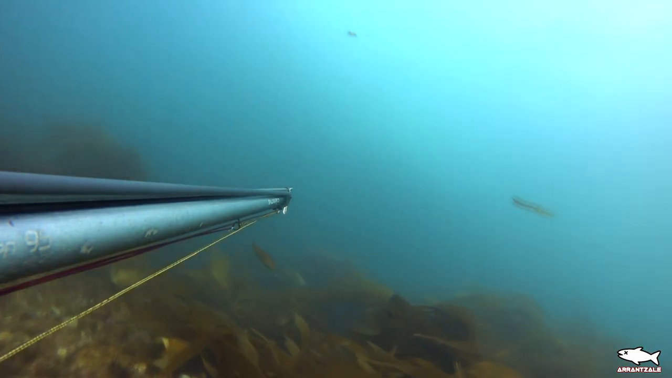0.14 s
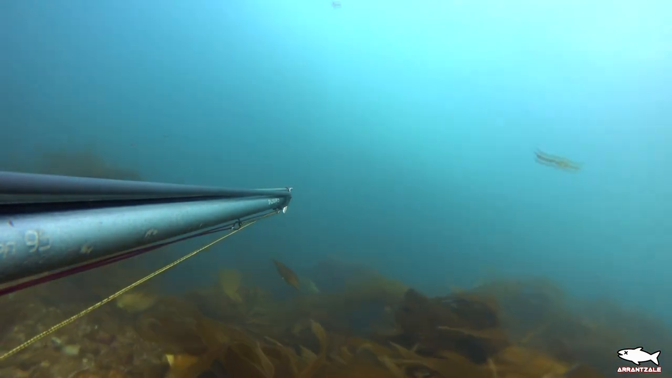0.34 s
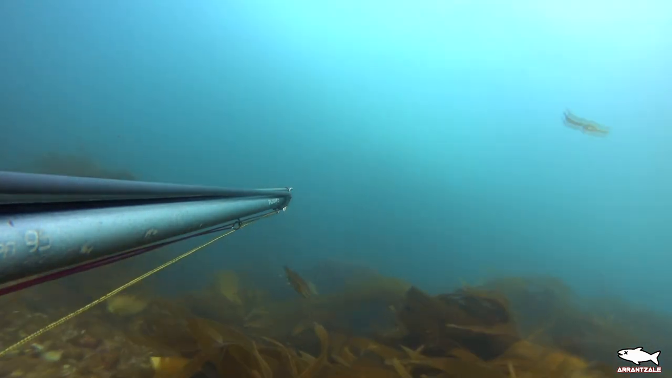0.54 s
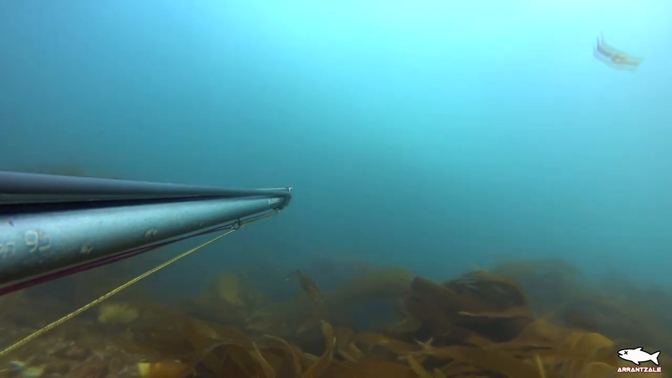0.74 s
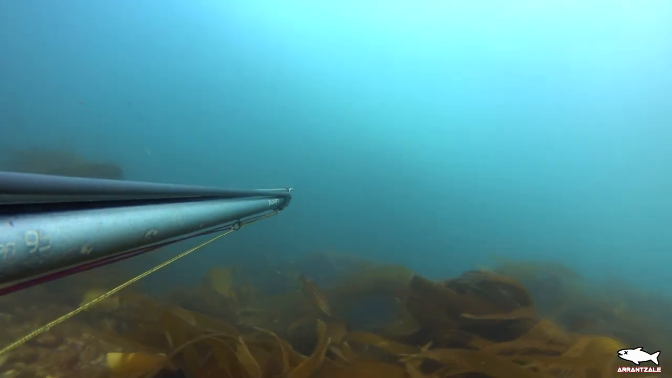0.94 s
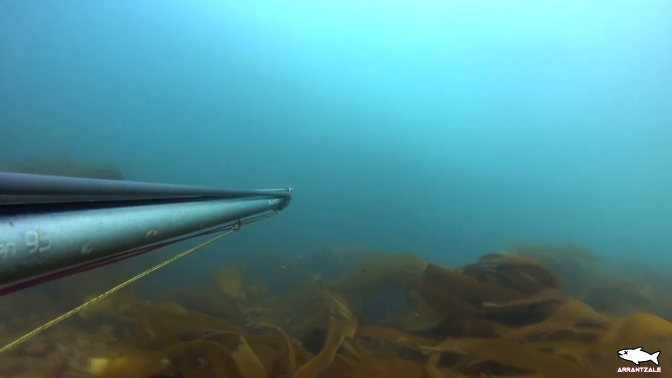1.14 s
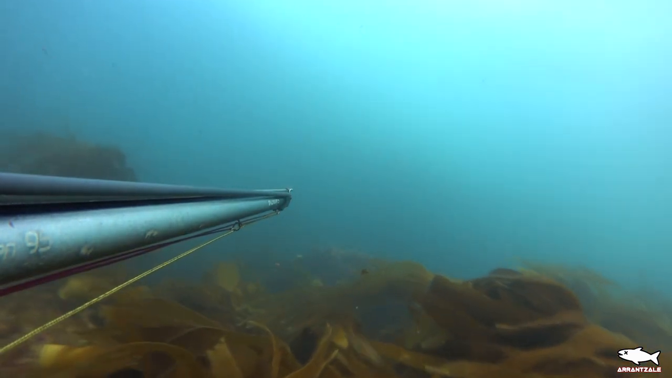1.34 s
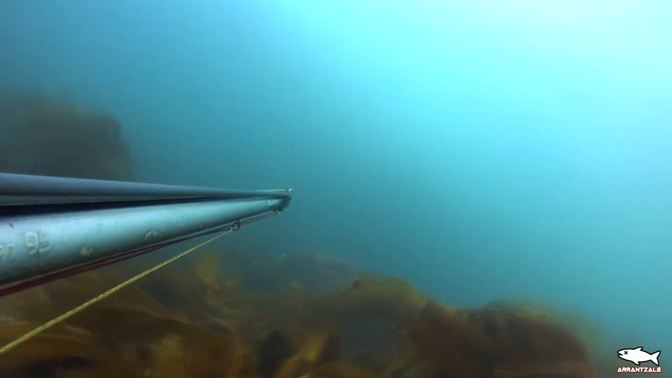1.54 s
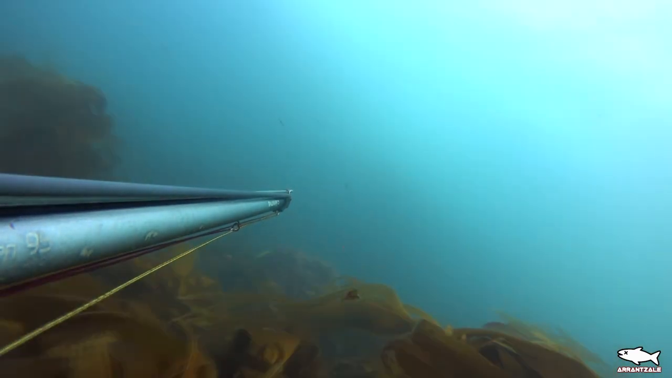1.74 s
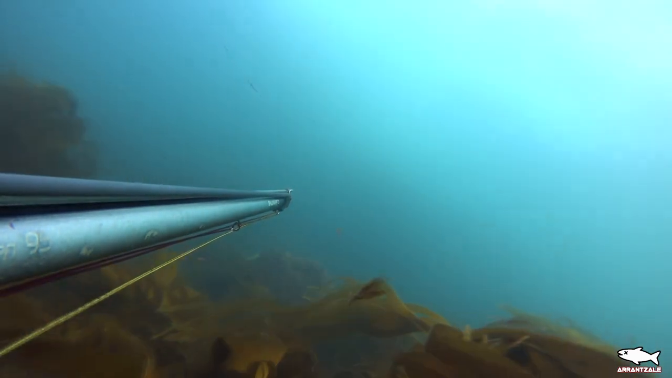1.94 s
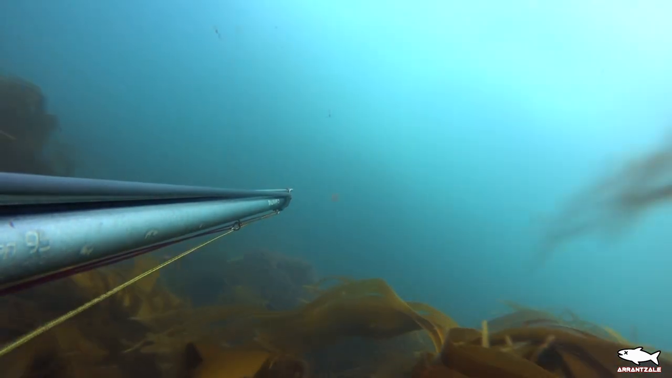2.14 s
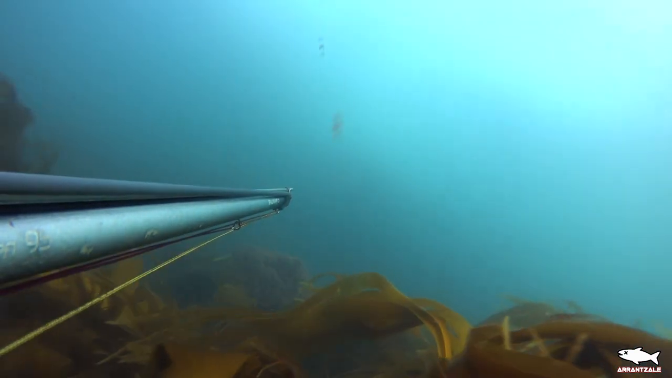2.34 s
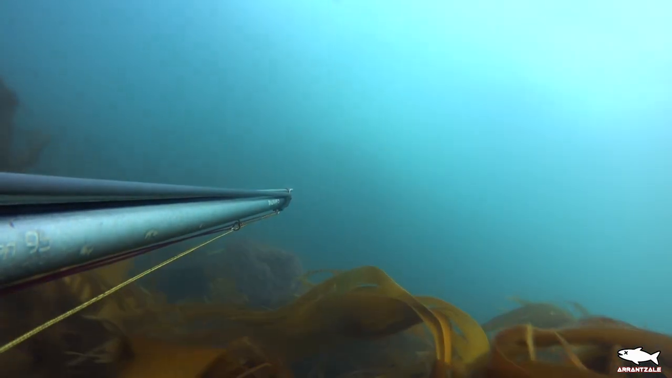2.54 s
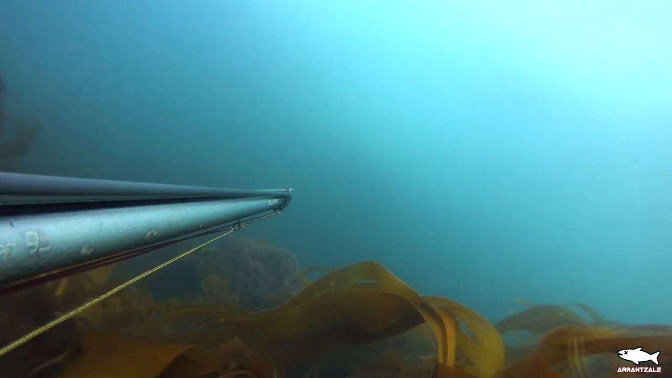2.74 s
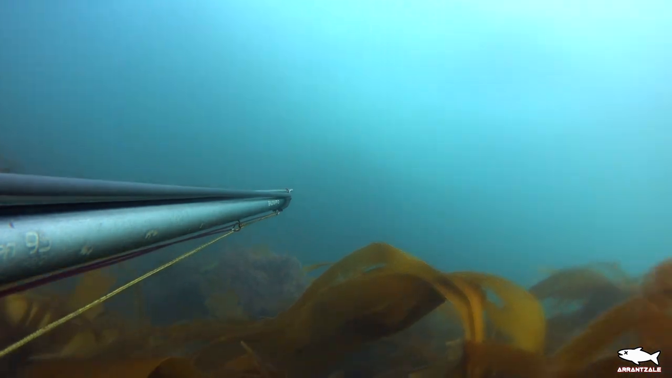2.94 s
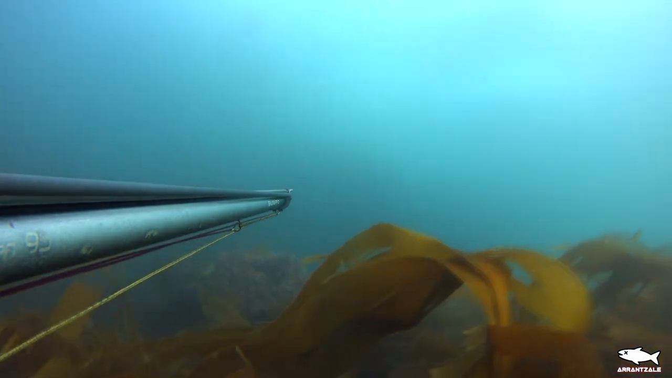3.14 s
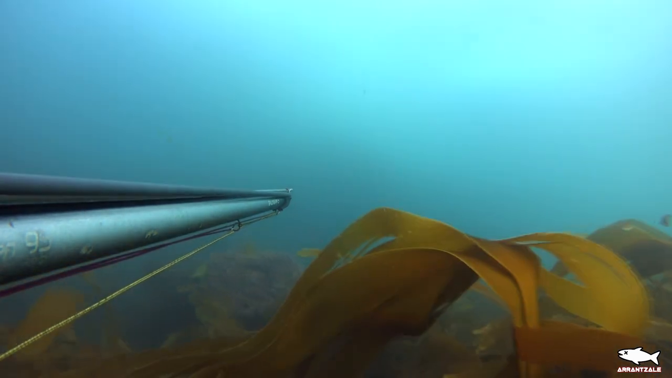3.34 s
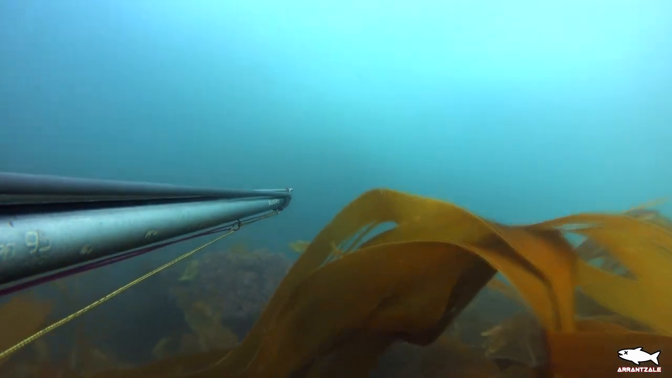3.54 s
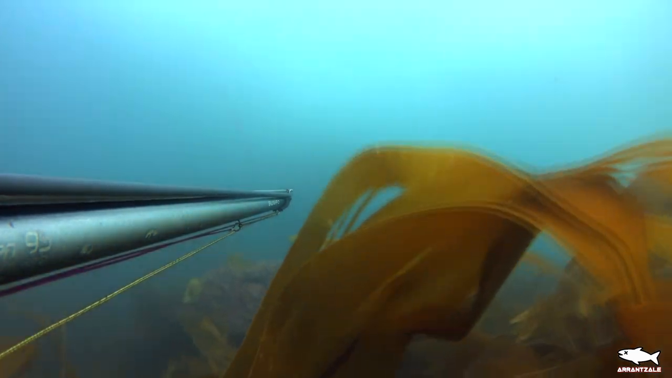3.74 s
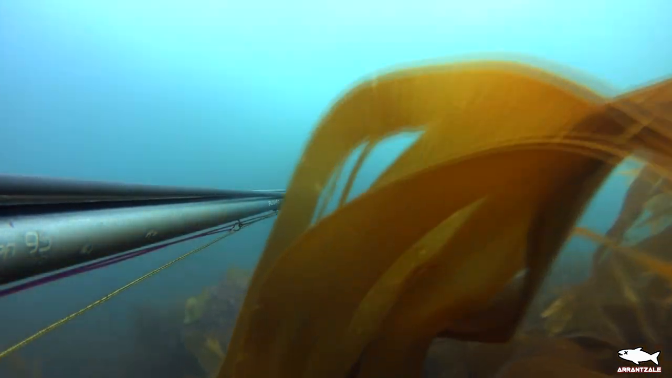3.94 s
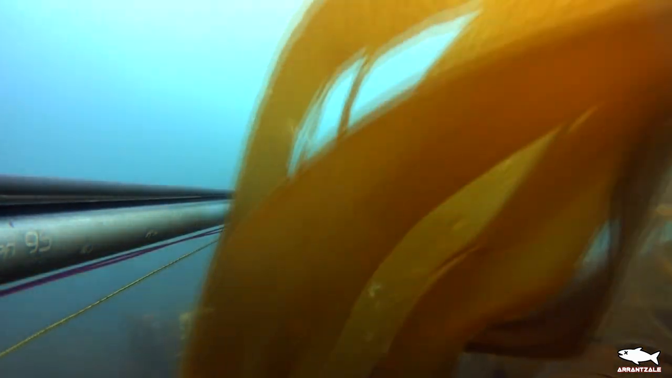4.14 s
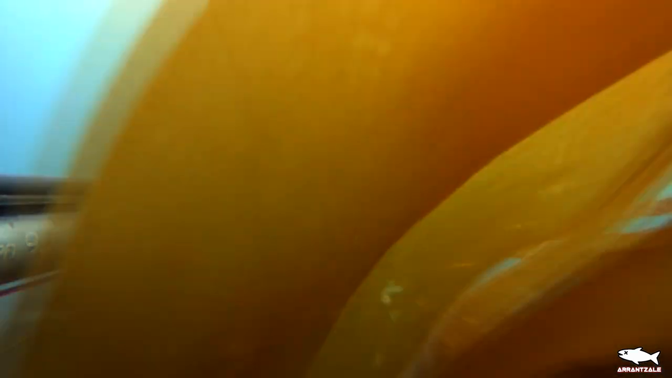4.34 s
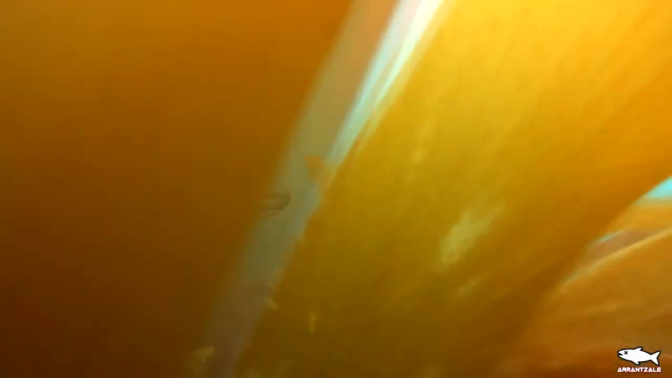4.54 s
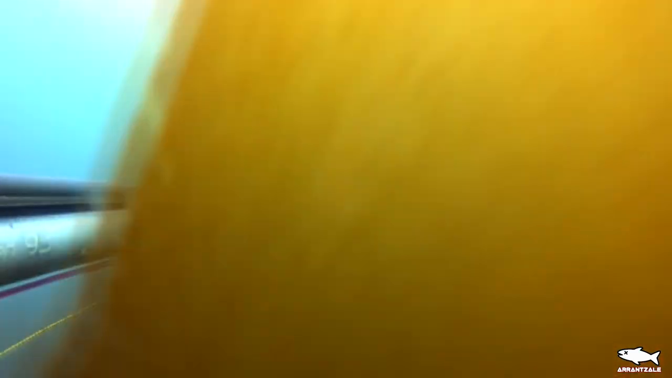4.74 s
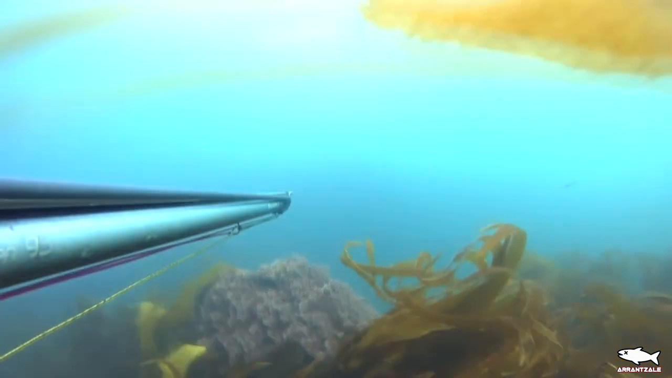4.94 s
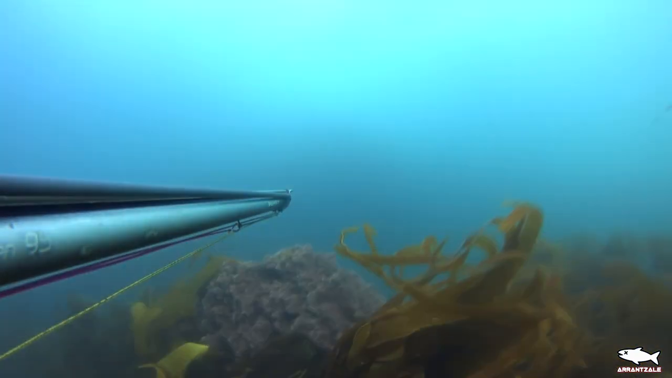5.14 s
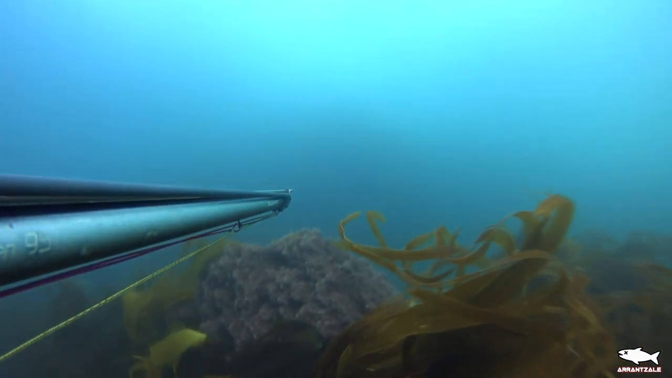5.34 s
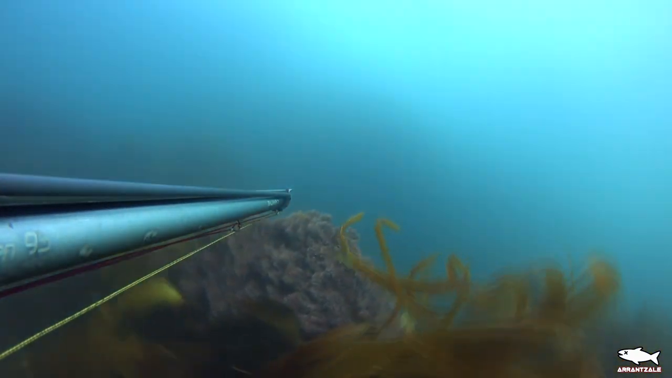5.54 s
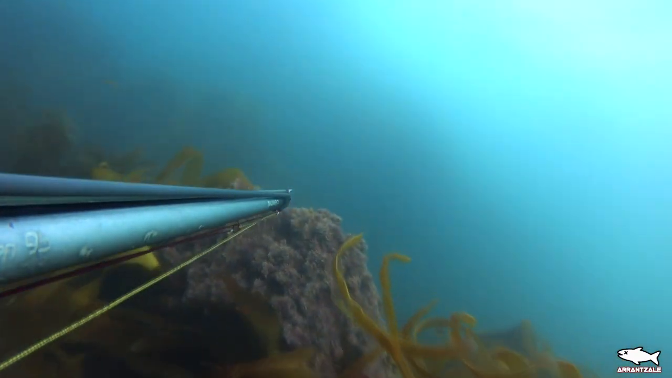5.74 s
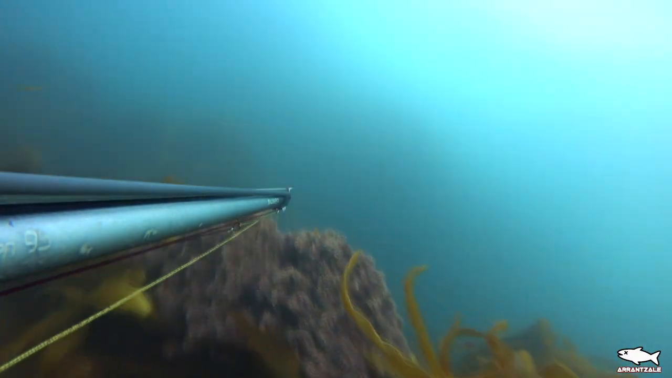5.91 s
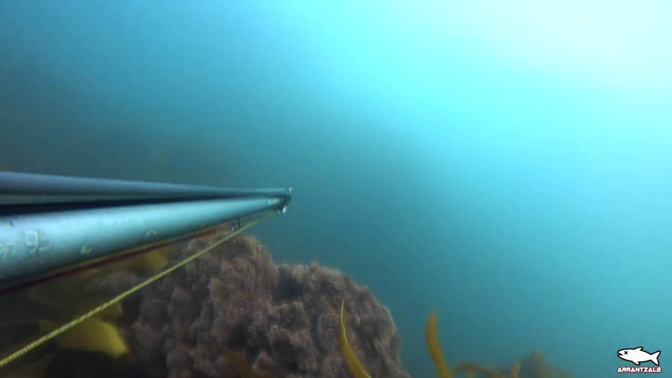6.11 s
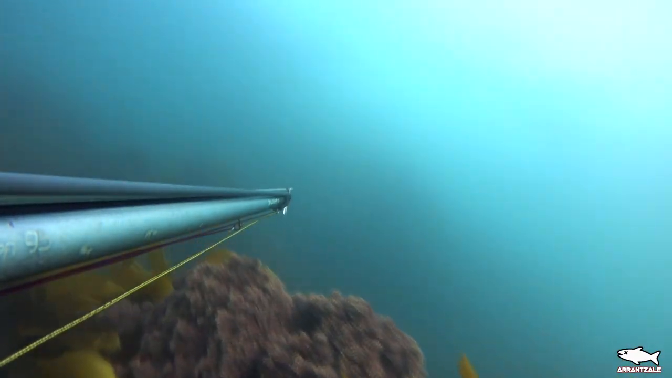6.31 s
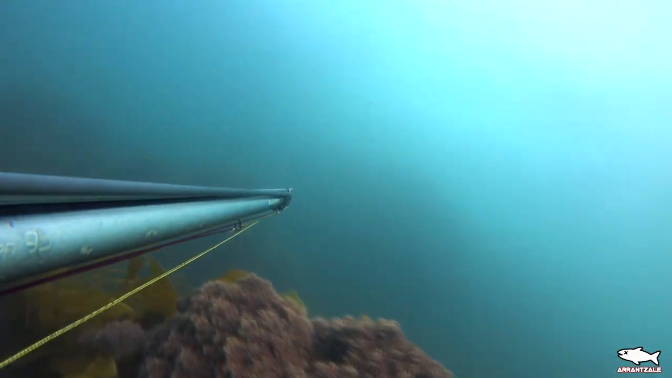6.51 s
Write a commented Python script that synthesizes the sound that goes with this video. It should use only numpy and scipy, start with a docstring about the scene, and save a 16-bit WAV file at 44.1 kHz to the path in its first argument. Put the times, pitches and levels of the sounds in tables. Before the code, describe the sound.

Muffled stereo sound from a camera drifting over kelp in the sea. At first it is quiet: water pushing, low rumble, microphone hiss, sparse crackly clicks and small knocks on a barrel held by a hand. After a brief thudding scuff, it calms again, until seaweed strikes the housing and rubs over it with loud, hollow knocks and gritty slips, fading at the very end.

```python
"""Underwater, a camera in a sealed housing on a metal barrel drifts over kelp, for under seven seconds.
From the start: microphone hiss, a deep rocking rumble, far animal snaps and a hand rubbing the barrel.
Taps ring the barrel from 0.4 s to 4.3 s, brief wet squeaks come and go from 1.1 s on, and near 2.8 s the hand
squeezes and scuffs the barrel with low thuds. From about 4.5 s a frond slaps the case and drags across it in
slips and bumps. Contact is jerks and shoves ringing modes; squeaks are unsteady sines, hiss is noise."""
import sys
import numpy as np
from scipy.fft import rfft, irfft, next_fast_len
from scipy.io import wavfile
from scipy.ndimage import uniform_filter1d, map_coordinates

SR = 44100
rng = np.random.default_rng(int(sys.argv[2]) if len(sys.argv) > 2 else 0)


def dump_mix(stems):
    """Bounce the given channels to the path in sys.argv[1] as a 16-bit WAV at rate SR."""
    frames = np.atleast_2d(stems).T  # one column per channel
    limited = np.clip(frames, -1, 1)  # hard clip at full scale
    pcm = np.round(limited * 32767).astype(np.int16)
    wavfile.write(sys.argv[1], SR, pcm)


N = 294323

# All levels in the tables are relative: each source applies its own gains and filters.
# microphone hiss, in step and opposed, spectral density: [f/Hz, level/dB]
HISS_IN_STEP = [(180, -28.5), (300, -8.5), (532, -35), (719, 5), (1290, -10), (1670, 1.5), (1890, -27),
                (2260, -10), (5930, -11.5), (11000, -15), (14300, -102.5), (22000, -120)]
HISS_OPPOSED = [(59, -43), (100, 11.5), (124, -11), (215, -5), (404, -3), (611, -2), (1630, -13),
                (4030, -23), (6100, -26), (11000, -34.5), (14300, -69.5), (22000, -120)]
# water pushing on the case: [t/s, push level/dB, level of its upper part over the push/dB]
WATER = [(0.0, -65, 1.5), (0.37, -64, -5.5), (0.41, -57, 1.5), (0.57, -49, -9), (0.69, -58.5, -2),
         (0.75, -67, 0.5), (1.12, -62.5, -1), (1.33, -68.5, 1.5), (1.45, -56.5, -4.5), (1.87, -50, -4.5),
         (2.2, -61.5, -4), (2.6, -68, 1), (2.78, -57, -4), (2.82, -58.5, 8.5), (2.97, -61, 1.5),
         (3.33, -55, -7.5), (4.17, -60.5, -6.5), (4.47, -57, -3.5), (6.67, -61.5, -5.5)]
# far snaps: [t/s, high part level/dB, low part level/dB]
SNAPS = [(0.036, -49, -62), (0.1165, -51, -40), (0.157, -43, -41), (0.7954, -44, -54.5), (0.821, -48, -53),
         (1.056, -51.5, -39.5), (1.3857, -52, -46), (1.551, -47, -39), (1.869, -48, -38),
         (1.934, -42.5, -53), (1.9706, -37.5, -41), (2.0103, -56, -35.5), (2.2085, -43, -41),
         (2.6195, -51, -37.5), (2.795, -48, -44), (2.9253, -48, -52), (2.9633, -45, -41),
         (3.2008, -42, -36.5), (3.2966, -46, -35), (3.5604, -44.5, -34), (3.9388, -45.5, -52.5),
         (4.1959, -48, -53), (4.2597, -44.5, -43), (4.335, -40.5, -41), (4.4288, -48, -45)]
# what a snap rings in the case, high and low part: [f/Hz, width/Hz, level/dB]
SNAP_HIGH_MODES = [(2740, 250, -3.5), (5040, 980, -5), (6140, 210, 7), (8500, 3000, -16.5)]
SNAP_LOW_MODES = [(780, 96, -5.5), (1713, 53, 4.5), (2930, 930, -14.5)]
# brief wet squeaks: [start t/s, end t/s, first f/Hz, last f/Hz, level/dB]
SQUEAKS = [(1.106, 1.163, 780, 750, -61.5), (3.246, 3.269, 820, 850, -57),
           (4.499, 4.507, 1200, 1040, -44.5), (4.516, 4.529, 970, 964, -37.5), (4.53, 4.568, 970, 986, -46),
           (4.547, 4.568, 384, 388, -38), (6.131, 6.143, 648, 686, -25.5), (6.553, 6.617, 2960, 2990, -73),
           (6.615, 6.64, 3080, 3120, -72)]
# the hand on the barrel: [t/s, rubbing level/dB]
GRIP = [(0.0, -74.5), (0.3, -73), (0.55, -68), (0.75, -72.5), (1.2, -73.5), (1.5, -74.5), (2.2, -75),
        (2.5, -70.5), (2.77, -67.5), (2.83, -65), (2.97, -73), (3.3, -75.5), (4.3, -77), (4.5, -73)]
# taps on the barrel: [t/s, level/dB, extra level of the lowest mode/dB, left over right/dB]
TAPS = [(0.4, -55.5, 12, -4), (0.432, -44, 4, -4.5), (0.485, -52.5, 15.5, -2.5), (0.524, -44, -20, -8),
        (0.554, -46, -15, -6), (0.595, -34, -13, -3.5), (0.636, -29, -1, -3.5), (0.669, -38, 5.5, 1),
        (0.989, -20.5, -14, -2.5), (1.028, -37.5, -22, 0), (2.722, -48, -12, 0), (2.806, -44, 11, 0),
        (2.858, -43, 8, 1), (3.362, -51, -12, -4), (3.885, -51.5, -12, -3), (4.25, -53, -10, 2),
        (4.292, -50.5, -12, -3)]
# modes of the barrel: [f/Hz, level/dB, t60/s, phase lead of the right microphone/rad]
BARREL_MODES = [(265, -2, 0.13, 2.6), (424, -14.5, 0.076, 2.4), (640, -6.5, 0.078, 2.54),
                (750, -0.5, 0.025, 0.88), (911, 4, 0.05, 2.36), (1200, -12, 0.033, 1.28),
                (1330, -18, 0.033, 1.5), (1550, -28, 0.057, 1.5), (1820, -23, 0.072, 2.5)]
# the frond on the case: [t/s, push level/dB, rub level/dB, scratch level/dB,
#   bearing/dB: + on a face that bends, - square on]
FROND = [(4.48, -81, -91, -83, 0), (4.55, -36.5, -59, -81, 10), (4.585, -54.5, -55, -81, 0),
         (4.6, -30, -43, -59, 9), (4.68, -33, -45, -50.5, 5), (4.78, -37, -41.5, -60.5, 3.5),
         (4.82, -29, -37, -50, 7.5), (4.85, -19.5, -33.5, -47, -4), (4.92, -32, -39, -51.5, 10.5),
         (5.02, -22.5, -41, -50.5, 0), (5.06, -30.5, -46.5, -43.5, 7), (5.08, -37, -43.5, -58, 4),
         (5.3, -34.5, -41.5, -57, 2.5), (5.49, -32.5, -39, -56.5, 0), (5.6, -31.5, -35.5, -63.5, -4.5),
         (5.75, -33, -32.5, -56.5, -2), (5.91, -31, -33.5, -47.5, -5.5), (6.12, -34, -40, -47, 8),
         (6.2, -31, -38.5, -50, 3.5), (6.3, -32.5, -39, -47, 7), (6.4, -35.5, -35, -55, -4),
         (6.5, -41.5, -44.5, -57.5, -3.5), (6.56, -51, -47.5, -63, -3), (6.6, -57, -62, -84, -3),
         (6.67, -73, -70, -77, -3)]
# single blows that reach the case, the hand's scuffs and thuds near 2.8 s and later bumps:
#   [t/s, rap level/dB, push level/dB, push f/Hz, scratch level/dB, lean to the left/dB]
BLOWS = [(2.814, -31, -39.5, 70, -56, -8), (2.827, -42, -34.5, 76, -59, -1),
         (2.857, -23.5, -30.5, 61.9, -59, .6), (2.872, -42, -38.5, 87.6, -57, -12),
         (2.912, -34, -36, 61.5, -54, -8), (2.927, -33.5, -38.5, 70, -58, -4),
         (4.103, -34, -44.5, 144, -45, -3), (4.504, -18, -32.5, 84.5, -40.5, 2),
         (4.555, -25, -39, 100, -68, -1), (4.594, -14, -30, 102, -49, -1),
         (4.608, -7.5, -22.5, 162, -43, 0), (4.633, -4.5, -22, 94, -30, 2.5),
         (4.651, -7.5, -20, 102, -25.5, 1), (4.7, -7.5, -22, 96, -24, -1.5),
         (4.715, -25.5, -31, 100, -31, 1), (4.832, -6, -17.5, 220, -23.5, 23.5),
         (4.856, -17, -32, 145, -18, 0), (4.867, -6, -29, 199, -24, -5), (4.883, -16, -21.5, 116, -32.5, 1),
         (4.925, -5.5, -23.5, 258, -15.5, -3), (4.984, -17.5, -29, 99.6, -14, 2.5),
         (5.02, -14.5, -28, 194, -11.5, -4), (5.026, -4.5, -13, 62.6, -8.5, 1),
         (5.053, -5.5, -23.5, 178, -19, 6), (5.122, -10.5, -33, 142, -22, -8),
         (5.143, -10, -36, 114, -17.5, -0.5), (5.171, -5.5, -25, 110, -14, -1.5),
         (5.221, -5, -31.5, 104, -20, -9), (5.326, -15.5, -30.5, 80.7, -23, -1),
         (5.396, -14, -31.5, 234, -20, -6), (5.494, -1.5, -21.5, 204, -11, -2),
         (5.521, -12, -45, 134, -24, 4), (5.563, 0, -16.5, 118, -16.5, -0.5),
         (5.653, -8, -23.5, 113, -18.5, -2.5), (5.716, 2.5, -20.5, 121, -10, 0),
         (5.808, -12, -23, 99.7, -30, 2), (5.917, 2, -20.5, 223, -11, 1),
         (6.038, -11, -25.5, 103, -21.5, -3.5), (6.131, -2.7, -11.5, 107, -18, 0.5),
         (6.191, -24, -24.5, 97, -37, 3), (6.273, -8.5, -40, 97, -24, 4), (6.309, -32, -31, 185, -27.5, 7),
         (6.338, -14.5, -40, 220, -20.5, .6), (6.358, -8, -27.5, 176, -37, 0),
         (6.466, -10.5, -41, 99, -32, -4)]
# modes of the case: [f/Hz, width/Hz, in-step level/dB, level opposed between the microphones/dB]
CASE_LOW = [(72.5, 25, -11, -7.5), (96, 14.8, 3, -13.5), (160, 56, -6.5, -32.5), (214, 28, -4, -1.5),
            (278, 41, -7.5, -13), (366.3, 95, -12, -12)]
CASE_MID = [(447, 160, -0.5, -8.5), (655, 78.5, 4.5, 3.5), (871, 227, -3, -3), (1041.5, 78, 2.5, -2),
            (1248, 184, -6, -8), (1490, 220, -15.5, -7)]
CASE_HIGH = [(1593, 135, 4, 3), (1936, 150, 2, 4.5), (2128, 113, 3, -3), (2374, 350, -4, -3),
             (3280, 1460, -15, -15), (3730, 176, -9, -12.5), (4240, 230, -22.5, -22.5),
             (4990, 160, -10.5, -11.5), (5840, 1280, -17.5, -21), (7970, 1700, -29.5, -25.5)]

TOP_HZ = 11240  # band limit of the camera
FFT_SIZE = next_fast_len(N + SR // 2)  # half a second of room for the rings
HZ = np.fft.rfftfreq(FFT_SIZE, 1 / SR)

# rocking under a -60.5 dB push of the water, its growth in dB per dB of push, its random waver
ROCK_DB, ROCK_FOLLOWS, ROCK_WAVER_DB = -60.5, 0.47, 1
# rocking under a -32.5 dB push of the frond, dB per dB of push
JOLT_DB, JOLT_GROWS = -54, 1.9
WATER_OPPOSED_DB = 2  # how much more the water drives the opposed shapes
# what the hand sends into the case: rub over its level, scratch at -73 dB, dB per dB, treble over scratch
GRIP_RUB_DB, GRIP_SCRATCH_DB, GRIP_SCRATCH_FOLLOWS, GRIP_BRIGHT_DB = 4.5, -80, 0.5, -4
FROND_FIRM_DB = 3  # upper part of the frond's push
# treble over a -60 dB frond scratch and a -23 dB blow scratch; harder ones are duller (dB per dB)
FROND_BRIGHT_DB, FROND_DULLS = 5.5, 0.67
BLOW_BRIGHT_DB, BLOW_DULLS = 0, 0.34
RATTLE_S, RATTLE_SHARE = 0.008, 0.17  # rattle around a blow's first touch: decay time, size


def amp(db):
    """dB to gain."""
    return 10 ** (np.asarray(db) / 20)


def unit(x):
    """Scaled to rms 1."""
    return x / np.sqrt(np.mean(x ** 2) + 1e-20)


def filtered(x, response):
    """x shaped by a complex response over HZ."""
    return irfft(rfft(x, FFT_SIZE) * response, FFT_SIZE)[..., :N]


def edge(hz, order, high=False):
    """Causal low- or high-pass made of repeated poles."""
    pole = 1 / (1 + 1j * HZ / hz)
    return (1 - pole if high else pole) ** order


def split(low_part, high_part, hz):
    """The first signal below hz joined to the second above it."""
    return high_part + filtered(low_part - high_part, edge(hz, order=2))


def resonances(modes, column=2):
    """Causal sum of modes, scaled so that white noise keeps its rms for the first level column."""
    each = []
    for k, (hz, width, *_) in enumerate(modes):
        mode = 1j * HZ * width / (hz ** 2 - HZ ** 2 + 1j * HZ * width)
        each.append((-1) ** k * mode)  # neighbouring modes swing in opposite directions

    def total(c):
        return sum(amp(m[c]) * mode for m, mode in zip(modes, each))

    return total(column) / np.sqrt(np.mean(abs(total(2)) ** 2))


def wobble(rate):
    """A smooth random curve, rate knots a second."""
    knots = rng.standard_normal(int(N * rate / SR) + 4)
    return map_coordinates(knots, [np.arange(N) * rate / SR])


def slips(rate, spread_db, lump_db):
    """Two streams of stick-slip jerks of uneven size that come in lumps, rms 1."""
    hits = rng.random((2, N)) < rate / SR
    size = rng.standard_normal((2, N)) * amp(spread_db * rng.standard_normal((2, N)))
    lumps = amp(lump_db * (wobble(12) + wobble(35)))
    return unit(hits * size * lumps)


def levels(rows):
    """A dB curve, one value per sample, for each column after the time."""
    s, *columns = np.transpose(rows)
    return [np.interp(np.arange(N) / SR, s, db) for db in columns]


def joined(first_db, second_db):
    """Gain of two unrelated contacts together: their powers add."""
    return np.hypot(amp(first_db), amp(second_db))


def shaded_noise(points):
    """White noise given a smooth spectrum over log frequency, rms 1."""
    hz, db = np.transpose(points)
    curve = np.interp(np.log(HZ + 1), np.log(hz + 1), db)
    return unit(filtered(rng.standard_normal(N), amp(curve)))


def hiss():
    """Steady microphone noise floor, part in step and part opposed."""
    mid = amp(-70) * shaded_noise(HISS_IN_STEP)
    side = amp(-61) * shaded_noise(HISS_OPPOSED)
    return np.array([mid + side, mid - side])


def swell():
    """The housing rocks: deep rumble that follows the pushes, mostly alike in both microphones."""
    rumble_band = edge(56, order=4) * edge(23.6, order=2, high=True)
    mid, side = filtered(rng.standard_normal((2, N)), rumble_band)
    rocking = ROCK_DB + ROCK_FOLLOWS * (levels(WATER)[0] + 60.5) + ROCK_WAVER_DB * wobble(5)
    jolts = JOLT_DB + JOLT_GROWS * (levels(FROND)[0] + 32.5)
    rumble = np.array([mid + 0.26 * side, mid - 0.66 * side]) / np.std(mid)
    return joined(rocking, jolts) * rumble


def snaps():
    """Far animal clicks ring two sets of modes: the clearest are placed, fainter ones fall at random."""
    high = (rng.random(N) < 60 / SR) * amp(-58.0 + 2.6 * rng.standard_normal(N))
    low = (rng.random(N) < 90 / SR) * amp(-52.0 + 1.15 * rng.standard_normal(N))
    for start, high_db, low_db in SNAPS:
        i = round(start * SR)
        high[i] += amp(high_db)
        low[i] += amp(low_db)
    high_ring = filtered(high, resonances(SNAP_HIGH_MODES))
    low_ring = filtered(low, resonances(SNAP_LOW_MODES) * edge(440, order=2, high=True))
    return (high_ring + low_ring) * amp([[1], [-1]])  # left 2 dB over right


def squeaks():
    """Short gliding tones, unsteady in pitch and level, with a quick start and a fading end."""
    out = np.zeros(N)
    for start, end, first_hz, last_hz, db in SQUEAKS:
        u = np.linspace(0, 1, round((end - start) * SR))
        flutter = uniform_filter1d(rng.standard_normal((2, len(u))), size=300, axis=1) * np.sqrt(300)
        hz = (first_hz + (last_hz - first_hz) * u) * (1 + 0.019 * flutter[0])
        phase = np.cumsum(2 * np.pi * hz / SR)
        shape = np.minimum(1, 12 * u) * np.minimum(1, 3 * (1 - u)) * amp(0.76 * flutter[1])
        out[round(start * SR):][:len(u)] += amp(db + 2.5) * shape * np.sin(phase)
    return out


def grip():
    """The hand on the barrel: sparse small slips keep the barrel's modes murmuring."""
    jerks = amp(levels(GRIP)[0]) * slips(250, 2.6, 2.1)[0]
    jerks[round(GRIP[-1][0] * SR):] = 0  # the rubbing stops at the last row
    both = 0
    for hz, level_db, t60, lead in BARREL_MODES:
        width = np.log(1000) / (np.pi * t60)
        mode = 1j * HZ * width / (hz ** 2 - HZ ** 2 + 1j * HZ * width)
        both = both + amp(level_db) * mode * np.exp(1j * np.array([[0], [lead]]))
    return filtered(jerks, both / np.sqrt(np.mean(abs(both.mean(axis=0)) ** 2)))


def taps():
    """Each tap rings the barrel; the microphones sit at different points of each mode."""
    out, t = np.zeros((2, N)), np.arange(SR // 5) / SR
    rise = 1 - np.exp(-t / 0.0015)
    for start, db, low_db, pan_db in TAPS:
        ring = 0
        for k, (hz, level_db, t60, lead) in enumerate(BARREL_MODES):
            phase = 2 * np.pi * hz * t + np.array([[0], [lead]])
            strength_db = level_db + (low_db if k == 0 else 0) + rng.normal(0, 1.5)
            ring = ring + amp(strength_db - 60 * t / t60) * np.sin(phase)
        i = round(start * SR)
        out[:, i:i + len(t)] += amp(db + np.array([[0.5], [-0.5]]) * pan_db) * ring * rise
    return out


def slipping():
    """Steady stick-slip of water, hand and frond: jerks for the low, middle, high and top modes."""
    water, firmness = levels(WATER)
    hand, = levels(GRIP)
    push, rub, scratch, bearing = levels(FROND)
    heave, rasp, grit = slips(900, 2.5, 1.4), slips(1500, 1.5, 1.65), slips(3000, 1.7, 1)

    deep = [joined(water, push), joined(water + WATER_OPPOSED_DB, push + bearing)] * heave
    firm = deep * joined(water + firmness, push + FROND_FIRM_DB) / joined(water, push)
    low = split(deep, firm, 220)

    hand_rub = hand + GRIP_RUB_DB
    middle = [joined(hand_rub, rub), joined(hand_rub, rub + bearing)] * rasp

    hand_scratch = GRIP_SCRATCH_DB + GRIP_SCRATCH_FOLLOWS * (hand + 73)
    treble = scratch + np.minimum(FROND_BRIGHT_DB - FROND_DULLS * (scratch + 60), 6)
    high = joined(hand_scratch, scratch) * grit
    top = joined(hand_scratch + GRIP_BRIGHT_DB, treble) * grit
    return np.array([low, middle, high, top])


def through_case(force, lean, modes, skirt, shared):
    """Two forces ring the in-step and opposed shapes of the modes; lean tips a contact to one side."""
    shared = np.clip(shared, 0, 1)
    in_step, opposed = resonances(modes) * skirt, resonances(modes, column=3) * skirt
    scale = 1 / np.sqrt(np.mean(abs(in_step) ** 2))
    mid = filtered(force[0], in_step * scale)
    # the shared opposed motion runs a quarter cycle from the in-step motion
    side = filtered(force[0], 1j * shared * opposed * scale)
    side = side + filtered(force[1], np.sqrt(1 - shared ** 2) * opposed * scale)
    side = side + filtered(lean, in_step * scale)
    return np.array([mid + side, mid - side])


def contact():
    """Steady slipping and single blows drive the low, middle and high modes of the case."""
    forces = slipping()
    leans, squeeze = np.zeros((3, N)), np.zeros((2, N))
    t = np.arange(2048) / SR
    for start, rap_db, push_db, push_hz, scratch_db, pan_db in BLOWS:
        bright_db = BLOW_BRIGHT_DB - BLOW_DULLS * max(scratch_db + 23, -8)
        # three parts: push, rap and scratch, each on the in-step and opposed shapes
        blow = rng.standard_normal((3, 2, len(t))) * np.exp(-t / RATTLE_S) * (1 - np.exp(-t / 0.0006))
        # in rap and scratch the first touch stands out of the rattle around it
        blow[1:] *= RATTLE_SHARE
        blow[1:, :, 40] += 1
        blow /= np.linalg.norm(blow, axis=2, keepdims=True)
        # the push is one springy shove
        shove = np.sin(2 * np.pi * push_hz * t) * np.exp(-2.5 * push_hz * t)
        blow[0] = shove * push_hz / 4000 * np.array([[1], [0.6]])
        blow *= amp([push_db + 21, rap_db, scratch_db])[:, None, None]

        span = slice(round(start * SR), round(start * SR) + len(t))
        forces[:3, :, span] += blow
        forces[3, :, span] += blow[2] * amp(bright_db)
        leans[:, span] += blow[:, 0] * np.tanh(pan_db / 17)
        # the wall flexes and squeezes the air inside at once
        squeeze[:, span] += shove * amp(push_db + 13 + np.array([[0.5], [-0.5]]) * pan_db)

    low_skirt = edge(630, order=2) * edge(50, order=2, high=True)
    mid_skirt = edge(370, order=2, high=True) * edge(2750, order=2)
    high_skirt = edge(1210, order=2, high=True) * edge(10000, order=2)
    low = through_case(forces[0], leans[0], CASE_LOW, low_skirt, shared=0.41)
    middle = through_case(forces[1], leans[1], CASE_MID, mid_skirt, shared=0.5)
    high_force = split(forces[2], forces[3], 7100)
    high = through_case(high_force, leans[2], CASE_HIGH, high_skirt, shared=0.32)
    air = filtered(squeeze, edge(62, order=2, high=True) * edge(720, order=2))
    return low + middle + high + air


def scene():
    """Everything that reaches the microphones."""
    return contact() + swell() + taps() + grip() + squeaks() + snaps() + hiss()


def record(dry):
    """The camera cuts everything above its band limit and adds a trace of white noise."""
    return filtered(dry, HZ < TOP_HZ) + amp(-108) * rng.standard_normal(dry.shape)


dry = scene()
out = record(dry)
dump_mix(out)
```